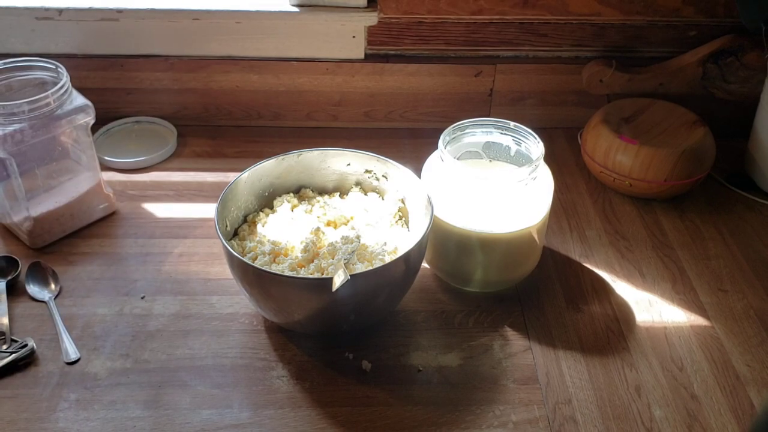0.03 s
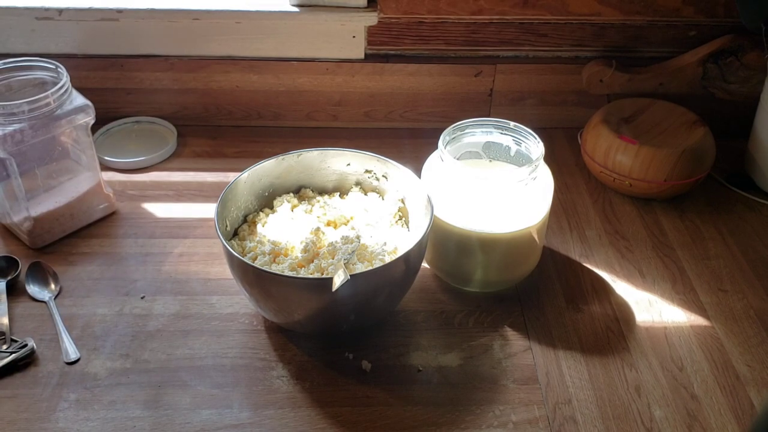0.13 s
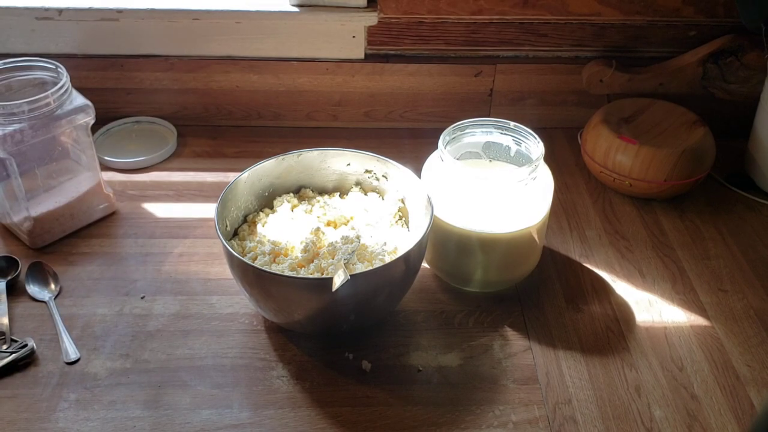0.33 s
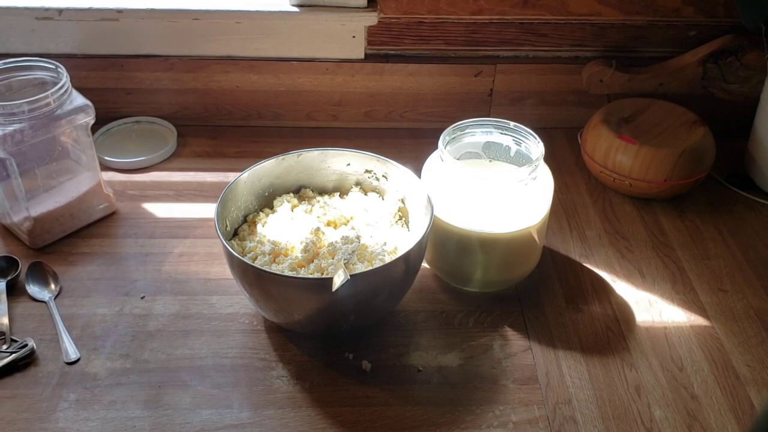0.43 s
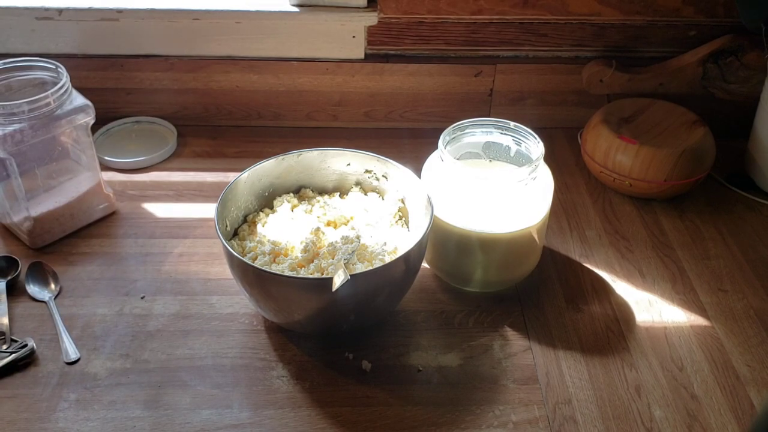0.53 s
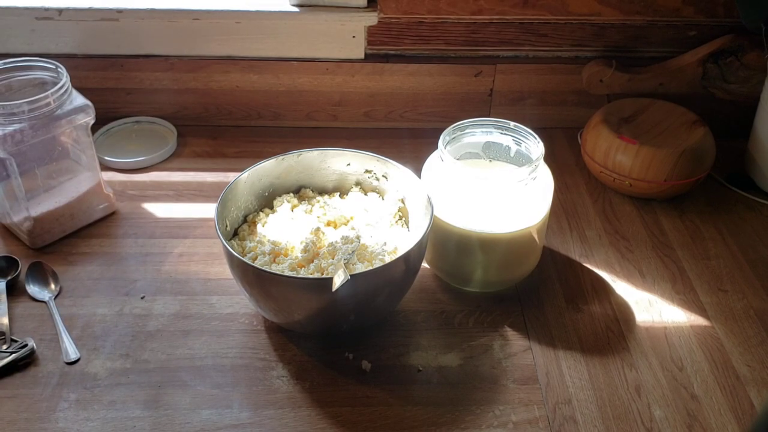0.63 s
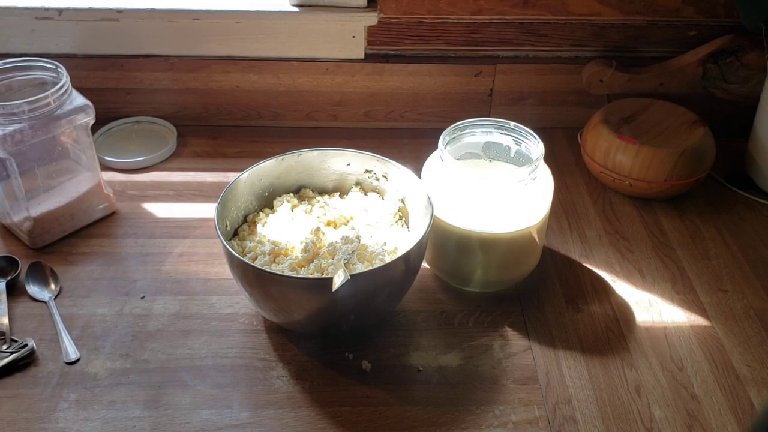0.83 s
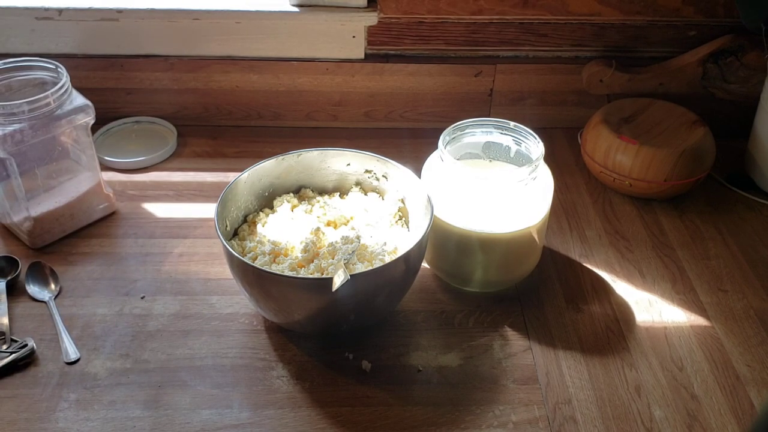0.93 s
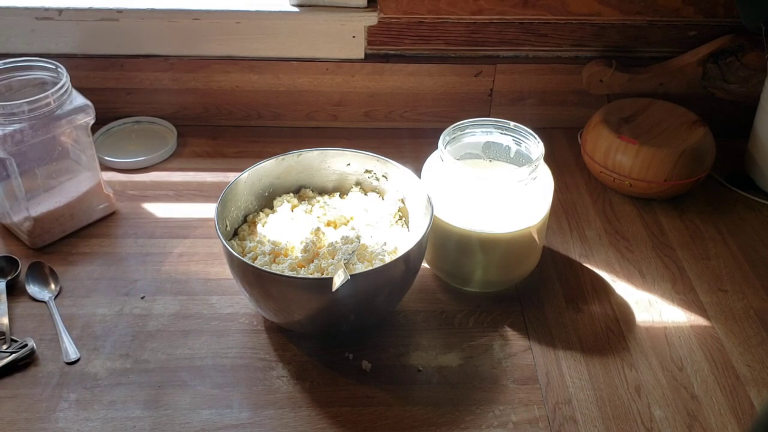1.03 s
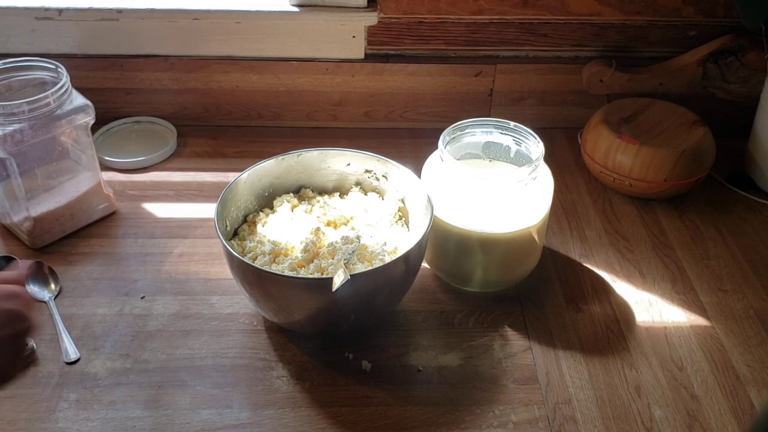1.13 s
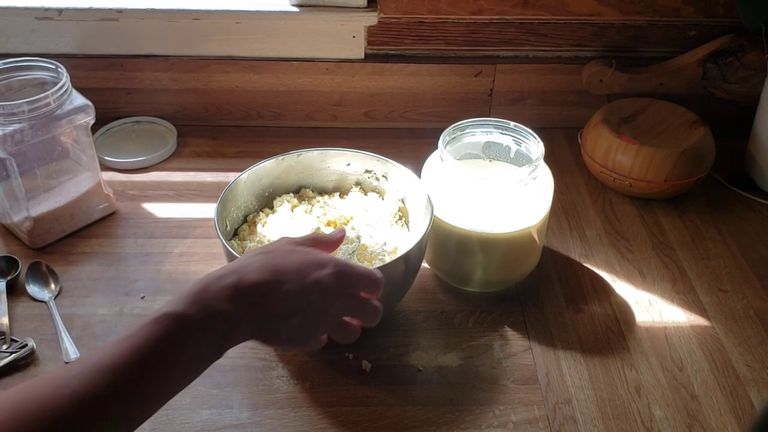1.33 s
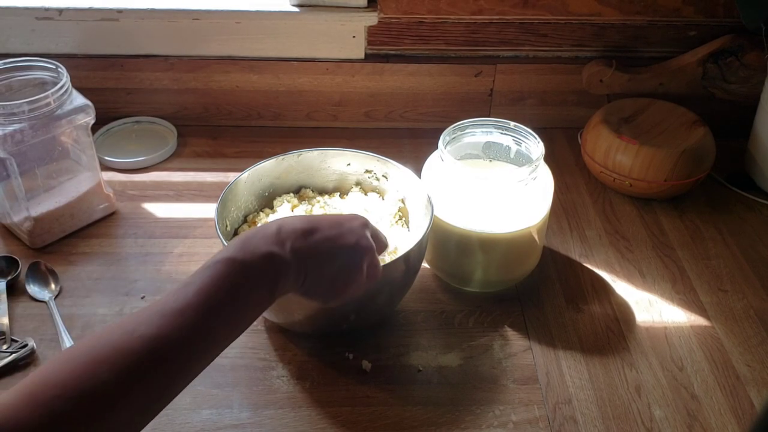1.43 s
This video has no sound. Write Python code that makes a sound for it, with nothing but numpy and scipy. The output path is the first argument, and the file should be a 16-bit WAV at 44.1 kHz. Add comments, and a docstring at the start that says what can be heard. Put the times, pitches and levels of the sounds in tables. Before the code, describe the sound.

A metal utensil clinks down on a wooden counter, followed by a soft knock.

```python
"""A utensil on a kitchen counter

A metal utensil is set down on a wooden counter, off to the right: it clinks, tips against a dish,
and a soft knock follows. Each impact is a burst of noise and a set of damped modes. Things slide
lightly and metal is rubbed as a hand reaches for the mixing bowl; both sounds are filtered friction
noise. The small room rings briefly after the impacts, and an appliance hums underneath."""
import sys
import numpy as np
from scipy import signal
from scipy.fft import rfft, irfft, next_fast_len
from scipy.io import wavfile

SR = 44100
rng = np.random.default_rng(int(sys.argv[2]) if len(sys.argv) > 2 else 0)


def to_wav(s):
    """Save 16-bit WAV."""
    ch = np.atleast_2d(s).T  # columns
    pcm = np.round(np.clip(ch, -1, 1) * 32767)  # PCM
    wavfile.write(sys.argv[1], SR, pcm.astype(np.int16))


N = 66150
HIT_N = N // 3  # samples that a hit takes to die away
T = np.arange(N) / SR


def from_db(db):
    """Amplitude ratio: tenfold for every 20 dB."""
    return 10 ** (np.asarray(db) / 20)


def unit_rms(x):
    """Normalisation of each channel to unit power."""
    return x / np.sqrt(np.mean(x ** 2, axis=-1, keepdims=True) + 1e-20)


def bin_hz(size):
    """Frequencies of the Fourier components of a signal of this length."""
    return np.arange(size // 2 + 1) * SR / size


def at_hz(points, hz):
    """Interpolation on a logarithmic frequency axis."""
    freqs, values = np.transpose(points)
    return np.interp(np.log(np.maximum(hz, 1)), np.log(freqs), values)


def colour(x, spectrum):
    """Zero-phase filtering by a curve of gains in dB."""
    n = x.shape[-1]
    size = next_fast_len(n + n // 16)
    gain = from_db(at_hz(spectrum, bin_hz(size)))
    return irfft(rfft(x, size) * gain, size)[..., :n]


def delayed(x, start):
    """A pure delay places a sound at its start in seconds."""
    lag = int(max(start, 0) * SR)
    return np.pad(x, ((0, 0), (lag, max(N - lag - x.shape[1], 0))))[:, :N]


def envelope(start, rise, hold, t60, size=N):
    """Linear rise, hold, then exponential decay by 60 dB in t60 seconds."""
    t = T[:size] - start
    decay = np.exp(-np.log(1000) * np.maximum(t - rise - hold, 0) / t60)
    return np.clip(t / rise, 0, 1) * decay


# Left-right coherence of diffuse sound. Each row: frequency in Hz, coherence from 0 to 1.
COHERENCE = [(60, 0.89), (200, 1), (500, 0.5), (1200, 0), (4000, 0.01), (16000, .1)]

def diffuse_noise(size=N):
    """In a diffuse field the two sides are alike at long wavelengths and unrelated at short ones."""
    alike = np.clip(at_hz(COHERENCE, bin_hz(size)), 0, 1)
    mid, side = rfft(rng.standard_normal((2, size)))
    left_right = np.sqrt(1 + alike) * mid + np.sqrt(1 - alike) * side * [[1], [-1]]
    return unit_rms(irfft(left_right, size))


# Tones of the appliance. Each row: frequency in Hz, rms level in dB before the drift.
HUM_TONES = [(59.3, -42.5), (118.6, -63), (212, -60.5), (285.3, -58.5), (380, -63), (570, -69)]
# Drift of the hum's level. Each row: time in seconds, gain in dB.
HUM_DRIFT = [(0, 0.5), (.6, 1.5), (.85, 0), (1.25, 0), (1.5, -4)]

def appliance_hum():
    """Periodic vibration of a motor gives a line spectrum."""
    hum = sum(from_db(db) * np.sqrt(2) * np.sin(2 * np.pi * (hz * T + rng.random()))
              for hz, db in HUM_TONES)
    return hum * from_db(np.interp(T, *np.transpose(HUM_DRIFT)))


# Noise floor of the room. Each row: frequency in Hz, relative spectral density in dB.
ROOM_NOISE_SPECTRUM = [(20, -30), (45, 7), (80, 1), (170, -11), (300, -1.5), (400, -6), (550, -10),
                       (1000, -14.5), (2000, -21.5), (4000, -27.5), (7000, -30.5), (8700, -47.5),
                       (12000, -29.5), (15500, -28.5)]
ROOM_NOISE_DB = -48.5

def room_noise():
    """Stationary noise has a continuous spectrum, here strongest in the bass."""
    return from_db(ROOM_NOISE_DB) * unit_rms(colour(diffuse_noise(), ROOM_NOISE_SPECTRUM))


# Decay of the kitchen. Each row: frequency in Hz, t60 in seconds.
REVERBERATION_TIMES = [(200, 0.3), (1200, 0.34), (3000, 0.29), (6000, 0.28), (12000, 0.2)]

def room_response():
    """Transfer function of the room: dense reflections decay exponentially, each band at its own rate."""
    hz, noise = bin_hz(HIT_N), rfft(diffuse_noise(HIT_N))
    edges_hz = [0, 400, 800, 2000, 4000, 8000, SR / 2]
    tail = 0
    for low, high in zip(edges_hz, edges_hz[1:]):
        band = irfft(noise * (hz >= low) * (hz < high), HIT_N)
        t60 = at_hz(REVERBERATION_TIMES, (low + high) / 2)
        tail += band * from_db(-60 * T[:HIT_N] / t60)
    return rfft(delayed(tail, start=.004)[:, :HIT_N])


def reverberation(x, room, wet_db):
    """Convolution with the room's response, at a set ratio of reverberant to direct energy."""
    reflections = unit_rms(irfft(rfft(x) * room, HIT_N))
    return from_db(wet_db) * np.sqrt(np.mean(x ** 2)) * reflections


DIRECT_LEFT_DB = 2  # gain of the direct ring on the left, before the balance in record()

def modal_rings(modes, room):
    """Free vibration: each mode is a damped sine with its reverberation. Shape: (modes, 2, samples)."""
    rings = []
    for hz, db, t60 in modes:
        phase = np.array([[rng.random()], [0]])  # differs between the sides
        decay = envelope(0, rise=.0015, hold=0, t60=t60, size=HIT_N)
        ring = from_db(db) * np.sin(2 * np.pi * (hz * T[:HIT_N] + phase)) * decay
        direct = ring * from_db([[DIRECT_LEFT_DB], [0]])
        rings.append(direct + reverberation(ring[1], room, wet_db=-6))
    return np.array(rings)


def contact_noise(spectrum, room, t60=.051):
    """A brief contact has a broad spectrum: a crack of noise that excites the room."""
    noise = unit_rms(colour(diffuse_noise(HIT_N), spectrum))
    crack = noise * envelope(0, rise=.002, hold=0, t60=t60, size=HIT_N)
    return crack + reverberation(crack, room, wet_db=2.5)


# Knocks on the counter. Each row: start in seconds, ring gain in dB, noise gain in dB.
WOOD_IMPACTS = [(0.078, -78, -52), (.609, -39, -37.5), (.614, -42.5, -38.5), (.640, -41, -46.5)]
# Modes that they excite. Each row: frequency in Hz, relative level in dB, t60 in seconds.
WOOD_MODES = [(284.7, -1, .22), (570, -4, 0.11), (1182, -6.5, 0.16), (1290, -12, .18), (2160, -9, 0.13),
              (2767, -3, 0.081)]
# Their contact noise. Each row: frequency in Hz, relative spectral density in dB.
WOOD_CONTACT = [(150, -20), (300, -15.5), (800, -13), (1200, 4.5), (1800, -4), (2700, -5), (5300, -9.5),
                (7200, -24), (9000, -41), (15000, -42)]

def knocks(room):
    """Soft impacts on wood excite little treble and sound dull; the first is very faint."""
    ring = modal_rings(WOOD_MODES, room).sum(axis=0)
    out = 0
    for start, ring_db, noise_db in WOOD_IMPACTS:
        thud = contact_noise(WOOD_CONTACT, room, t60=.055)
        out += delayed(from_db(ring_db) * ring + from_db(noise_db) * thud, start)
    return out


# The utensil's landing. Each row: start in seconds, ring gain in dB, noise gain in dB.
UTENSIL_IMPACTS = [(.232, -13, -15), (0.235, 1.5, -16.5), (.2425, -13, -22), (0.2748, -7, -26.5)]
# Its modes. Each row: frequency in Hz, relative level in dB, t60 in seconds.
UTENSIL_RESONANCES = [(1292, -25, .12), (1397, -20, 0.2), (1448, -18, .14), (1625, -23, .12),
                      (1713, -16, 0.22), (1767, -8, 0.12), (1836, -25.5, 0.067), (2100, -30.5, 0.075),
                      (2470, -37, 0.1196), (3417, -16, .14), (3465, -23, .14), (4333, -29.5, 0.13),
                      (5592, -22, 0.083), (6637, -32.5, 0.28), (8405, -43.5, .17), (9636, -53, 0.16),
                      (11610, -39.5, 0.12), (11700, -36.5, .12), (12950, -44, .08), (14400, -42, .11),
                      (15430, -36.5, .1)]
# Its contact noise on the counter. Each row: frequency in Hz, relative spectral density in dB.
UTENSIL_CONTACT = [(120, -50), (230, -11.5), (400, -7), (560, -4), (750, -12), (1000, -7), (1400, 5),
                   (2000, -5.5), (2600, -9), (3200, -3.5), (3800, -12.5), (5800, -14.5), (7200, -22),
                   (8800, -32), (12000, -29), (15500, -23)]

def utensil(room):
    """Superposition: the metal chatters as it lands, and each impact adds the same inharmonic ring."""
    ring = modal_rings(UTENSIL_RESONANCES, room).sum(axis=0)
    out = 0
    for start, ring_db, noise_db in UTENSIL_IMPACTS:
        crack = contact_noise(UTENSIL_CONTACT, room)
        out += delayed(from_db(ring_db) * ring + from_db(noise_db) * crack, start)
    return out


# Touches on the dish. Each row: start in seconds, ring gain in dB, noise gain in dB,
# favoured frequency in Hz, spread around it in octaves.
DISH_IMPACTS = [(.2915, 1, -36, 5050, .06), (0.2933, -4.5, -31, 2200, 1.6), (0.3136, -2, -18.5, 4500, 1.07),
                (.318, 0, -18.5, 1800, 1.75), (0.4413, -27, -44, 5940, 1.4), (.828, -34, -68, 3190, 0.13)]
# Modes of the dish. Each row: frequency in Hz, relative level in dB, t60 in seconds.
DISH_RESONANCES = [(985.6, -25, 0.22), (1036.4, -18.5, 0.17), (1063.6, -21.5, 0.2), (1210, -28.5, 0.24),
                   (1257, -23, 0.15), (1392, -21.5, 0.13), (1452, -22, 0.13), (1581, -20.5, 0.12),
                   (1730, -22.5, 0.15), (3058, -19.5, 0.18), (3125, -24, .18), (3235, -27.5, 0.083),
                   (5120, -23, 0.036), (5610, -20.5, 0.11), (5766, -21, .16)]
# Contact noise on the dish. Each row: frequency in Hz, relative spectral density in dB.
DISH_CONTACT_SPECTRUM = [(130, -35), (230, -8.5), (400, -2), (600, -1.5), (750, -8.5), (1000, 1.5),
                         (1400, 6), (2000, -5.5), (2600, -11.5), (3200, -1), (3800, -8), (5800, -3.5),
                         (7200, -17.5), (8800, -29.5), (12000, -25), (15500, -24.5)]

def dish(room):
    """Selective excitation: each touch favours the modes near a pitch that depends on where it lands."""
    rings = modal_rings(DISH_RESONANCES, room)
    mode_hz = np.array(DISH_RESONANCES)[:, 0]
    out = 0
    for start, ring_db, noise_db, centre_hz, spread in DISH_IMPACTS:
        octaves_away = np.log2(mode_hz / centre_hz)
        weights = from_db(ring_db) * np.exp(-.5 * (octaves_away / spread) ** 2)
        ring = np.tensordot(weights, rings, 1)
        crack = contact_noise(DISH_CONTACT_SPECTRUM, room)
        out += delayed(ring + from_db(noise_db) * crack, start)
    return out


GRAIN_DB, GRAINS_PER_S = 2, 300

def friction():
    """Tiny catches of the surface modulate the amplitude of noise and make it grainy."""
    roughness = np.interp(T * GRAINS_PER_S, np.arange(N), rng.standard_normal(N))
    return diffuse_noise() * from_db(GRAIN_DB * roughness)


# Light slides over the counter. Each row: start, rise, hold and t60 in seconds, level in dB,
# centre frequency in Hz, bandwidth in octaves.
SLIDE_STROKES = [(0.476, 0.0074, .006, 0.19, -54.5, 14000, .5), (0.675, .12, 0.18, 0.59, -59.5, 2600, 2.03),
                 (0.853, 0.074, 0.066, 0.29, -58.5, 14000, 0.35),
                 (1.025, .008, 0.0047, 0.064, -56.5, 6060, 0.22),
                 (1.46, 0.0063, 0.016, 0.22, -54, 7060, 0.1)]

def slides():
    """Sliding friction gives faint swishes, each a band of noise."""
    drive, out = friction(), 0
    for *timing, db, centre_hz, octaves in SLIDE_STROKES:
        edge_ratio = 2 ** (octaves / 2)
        band_hz = np.clip([centre_hz / edge_ratio, centre_hz * edge_ratio], 20, .45 * SR)
        swish = signal.sosfilt(signal.butter(2, band_hz, "band", fs=SR, output="sos"), drive)
        out += from_db(db) * envelope(*timing) * unit_rms(swish)
    return out


# Strokes on the metal. Each row: start, rise, hold and t60 in seconds, level in dB, lower edge in Hz.
METAL_STROKES = [(1.15, 0.02, .025, 0.41, -55, 3830), (1.299, 0.019, 0.041, 0.32, -42, 700),
                 (1.383, .01, .012, 0.23, -53.5, 1500)]
# Resonances of the metal. Each row: frequency in Hz, bandwidth in Hz, peak gain in dB.
METAL_RESONANCES = [(1640, 110, -3), (2370, 400, -11), (2900, 60, 1), (3032, 49, 2.5), (3090, 47, -4.5),
                    (4770, 58, 0), (4850, 56, 4), (6670, 70, -4), (6900, 74, 3), (10030, 54, -2),
                    (10200, 100, -11.5), (11720, 36, -4), (13100, 110, -7), (14600, 160, -3),
                    (15270, 70, -4)]
# Hiss of the rubbing. Each row: frequency in Hz, gain in dB.
METAL_HISS = [(300, -22), (800, -19), (2600, -14), (3600, -24), (4300, -13), (5600, -12), (7400, -17),
              (8400, -38), (9200, -26), (10500, -16), (13000, -15), (15500, -23)]
TREBLE_EDGE_HZ, TREBLE_T60_RATIO = 8500, .75

def rubbed_metal():
    """Forced vibration: friction drives resonances. Lighter strokes are thinner; treble fades first."""
    drive, out = friction(), 0
    body = colour(drive, METAL_HISS)
    for hz, width_hz, db in METAL_RESONANCES:
        body += from_db(db) * signal.lfilter(*signal.iirpeak(hz, hz / width_hz, fs=SR), drive)
    for start, rise, hold, t60, db, low_hz in METAL_STROKES:
        thinned = signal.lfilter(*signal.butter(2, low_hz, "high", fs=SR), body)
        stroke = from_db(db) * unit_rms(thinned)
        treble = irfft(rfft(stroke) * (bin_hz(N) > TREBLE_EDGE_HZ), N)
        out += (stroke - treble) * envelope(start, rise, hold, t60)
        out += treble * envelope(start, rise, hold, t60 * TREBLE_T60_RATIO)
    return out


def scene():
    """Sound pressures add linearly; all impacts share one room response."""
    room = room_response()
    impacts = utensil(room) + dish(room) + knocks(room)
    return impacts + rubbed_metal() + slides() + appliance_hum() + room_noise()


# The left side relative to the right. Each row: frequency in Hz, gain in dB.
LEFT_BALANCE = [(60, -12), (300, -15.5), (1000, -18), (1750, -19.5), (3200, -13.5), (5600, -13.5),
                (6700, -8.5), (9500, -13.5), (14000, -12.5)]
CUTOFF_HZ = 15900

def record(dry):
    """A level difference places the sound to the right; peaks clip and a low-pass cuts the top."""
    stereo = [colour(dry[0], LEFT_BALANCE), dry[1]]
    low_pass = signal.ellip(12, .1, 70, CUTOFF_HZ, fs=SR, output="sos")
    return signal.sosfilt(low_pass, np.clip(stereo, -1, 1))


dry = scene()
out = record(dry)
to_wav(out)
```